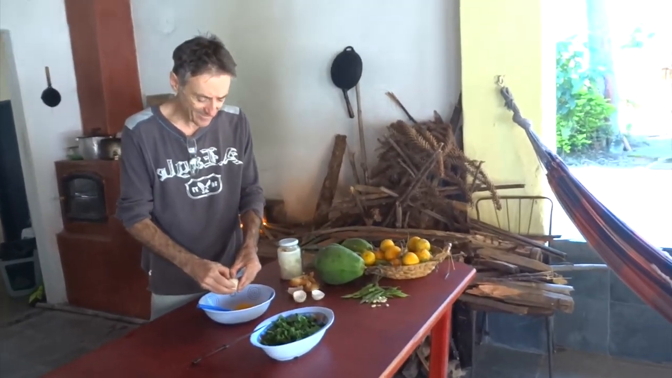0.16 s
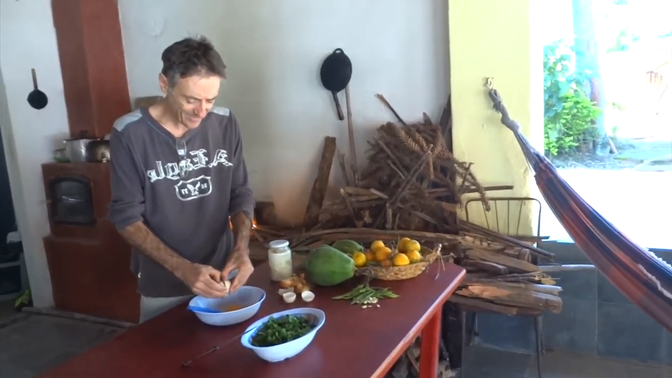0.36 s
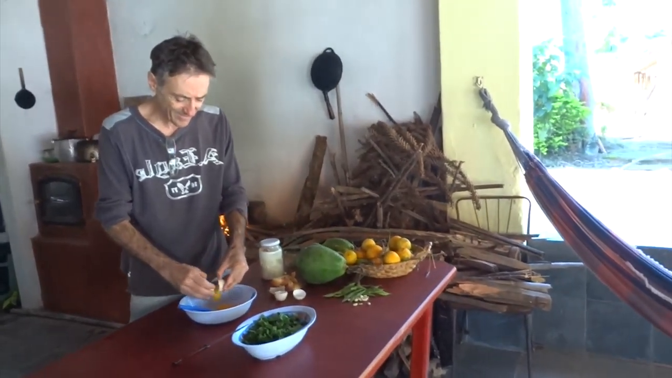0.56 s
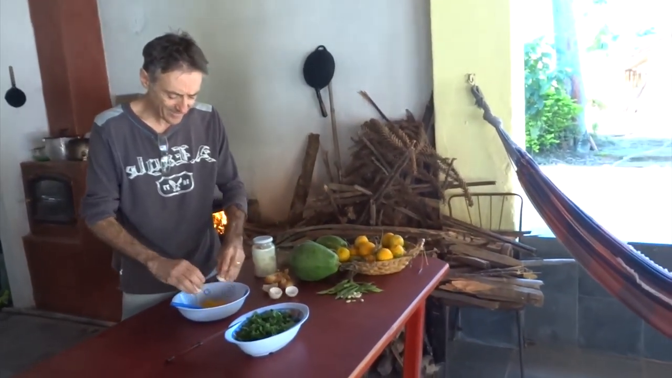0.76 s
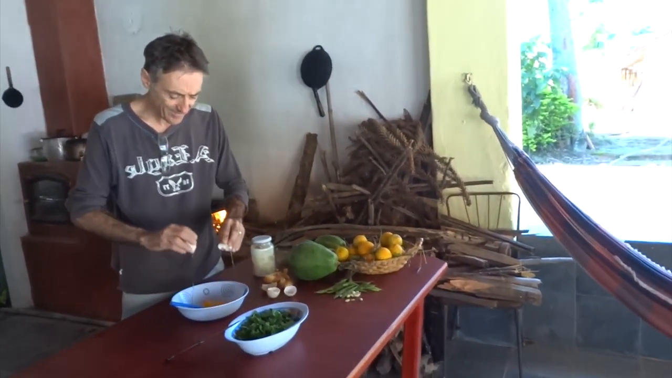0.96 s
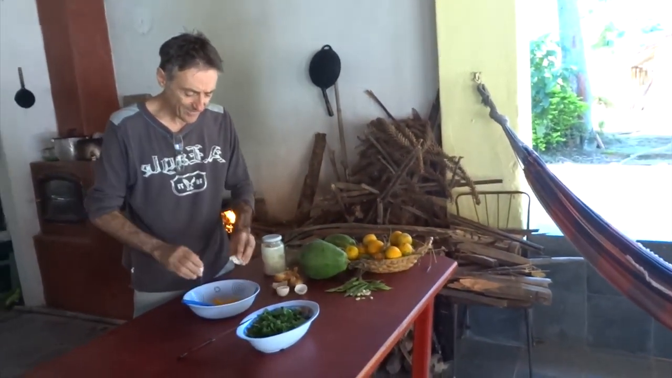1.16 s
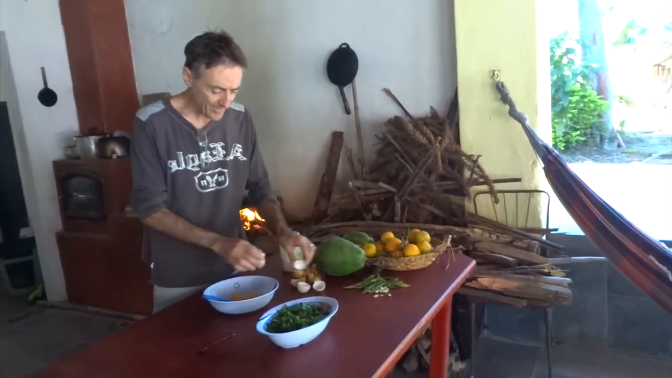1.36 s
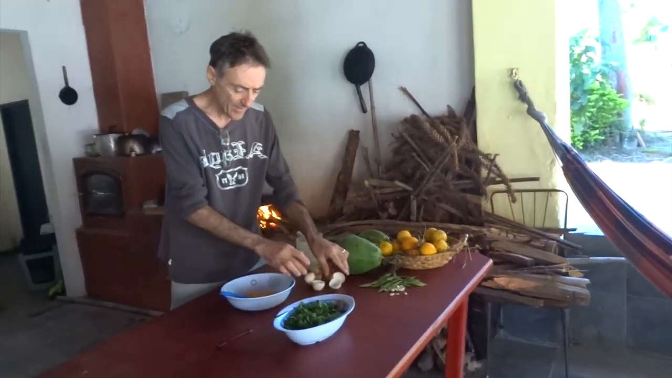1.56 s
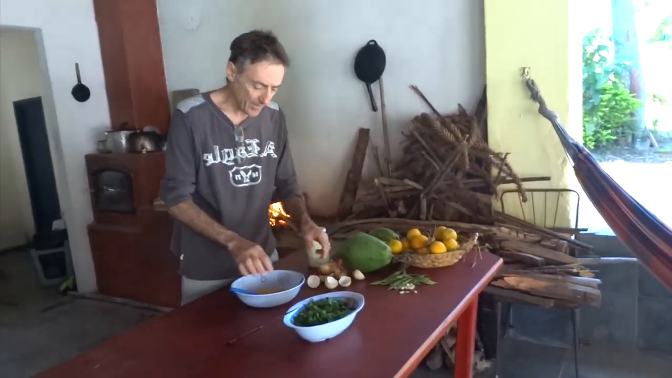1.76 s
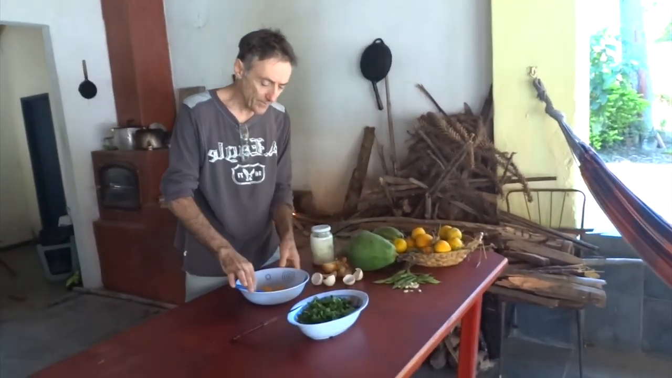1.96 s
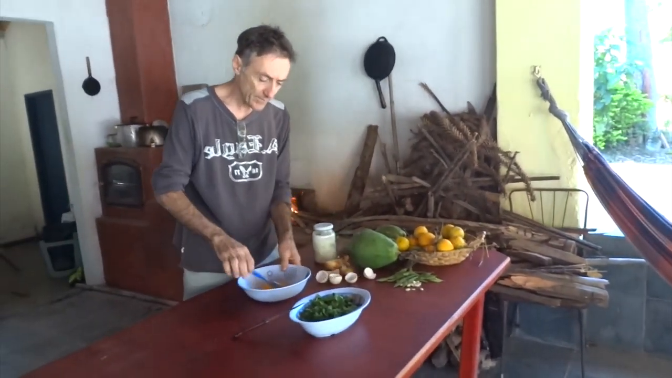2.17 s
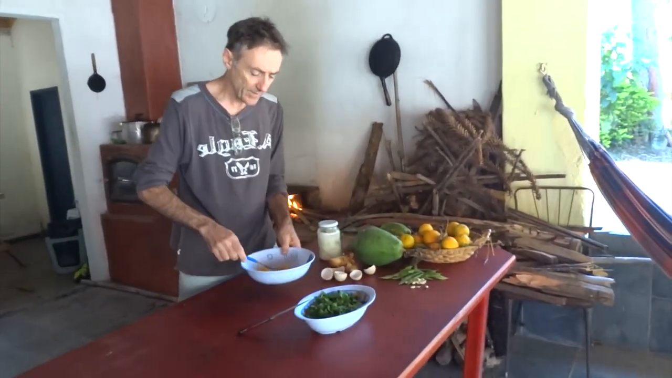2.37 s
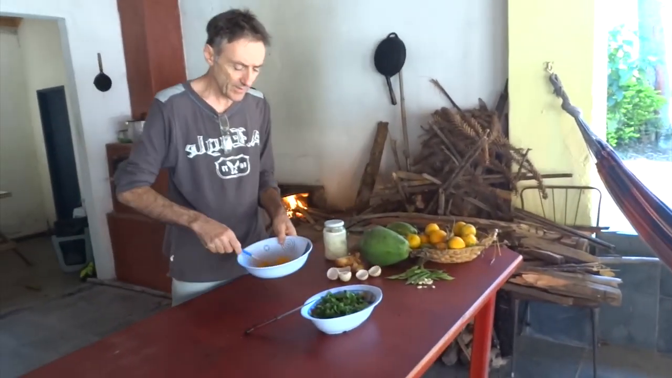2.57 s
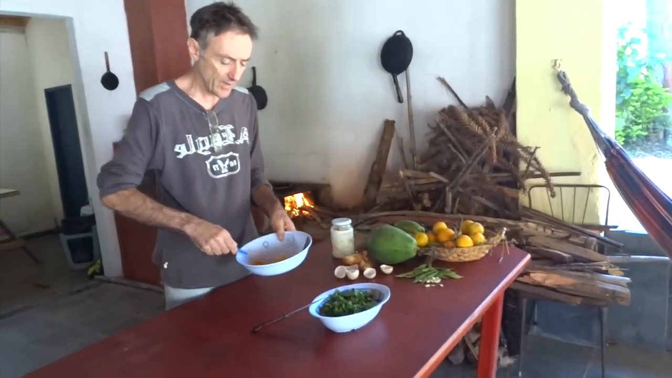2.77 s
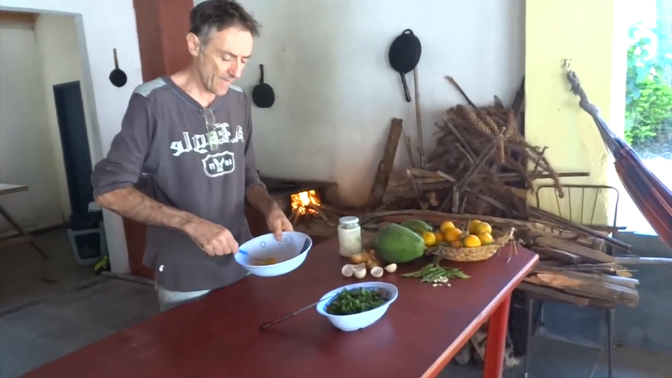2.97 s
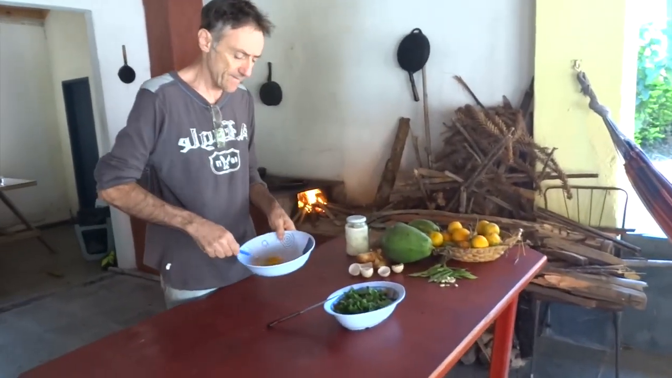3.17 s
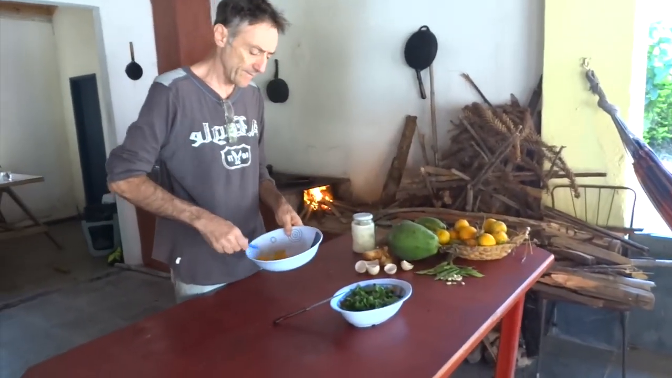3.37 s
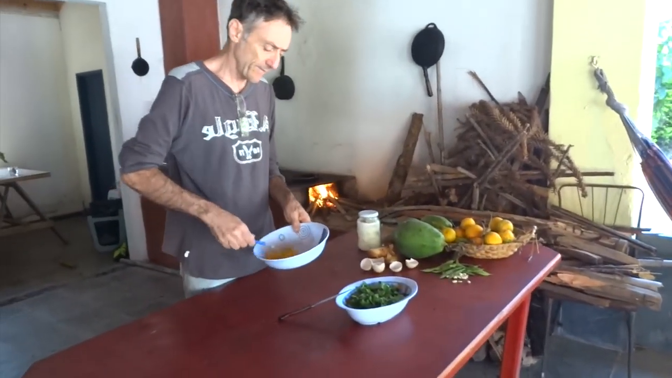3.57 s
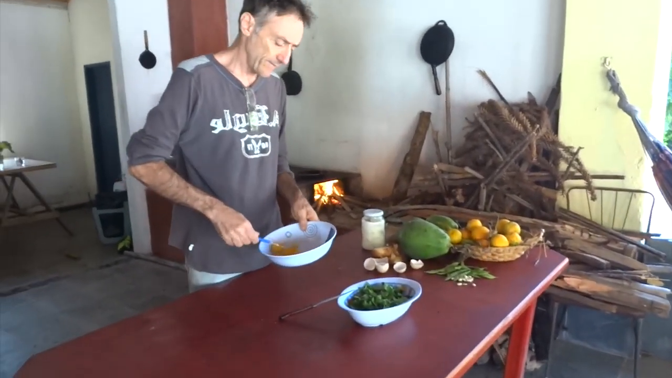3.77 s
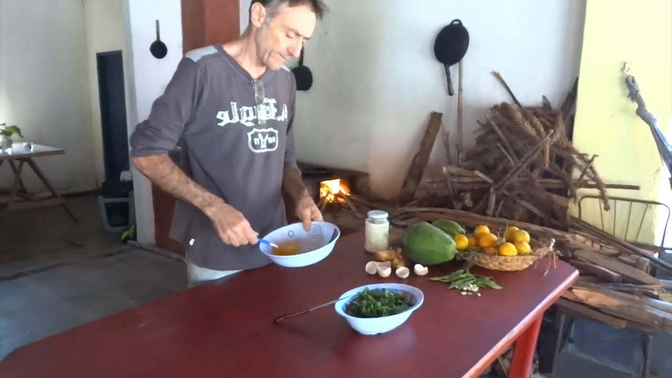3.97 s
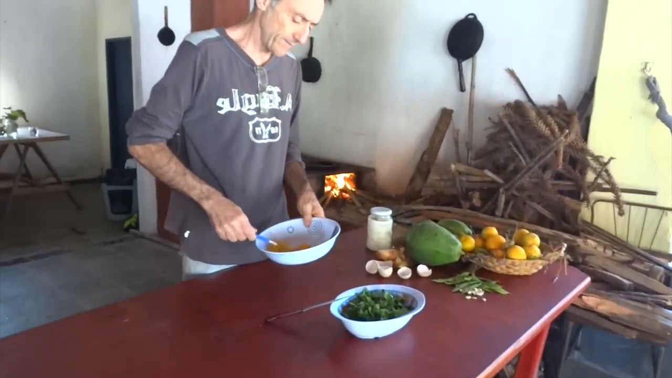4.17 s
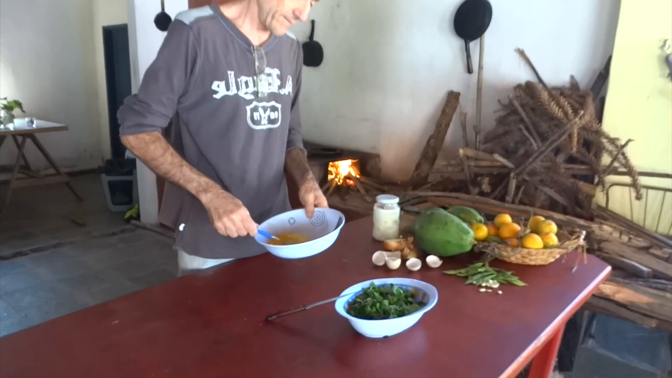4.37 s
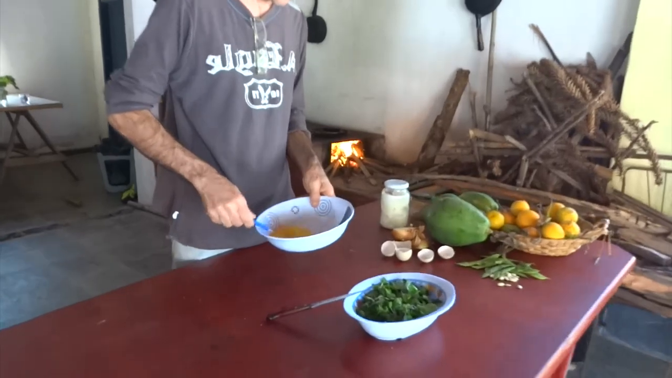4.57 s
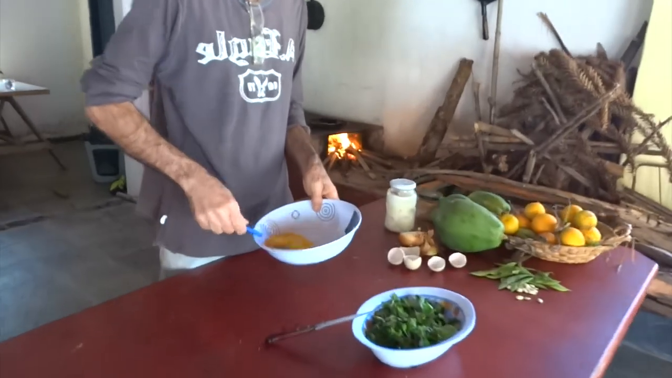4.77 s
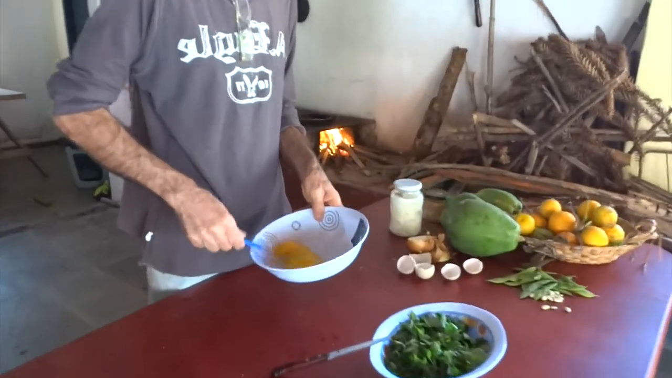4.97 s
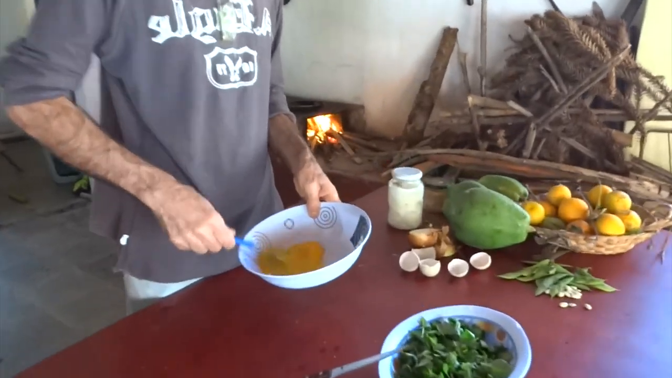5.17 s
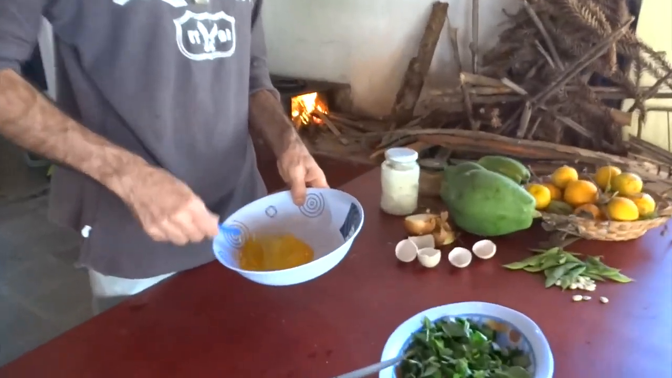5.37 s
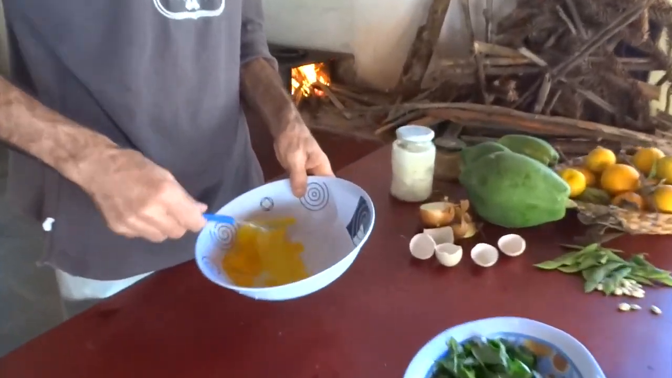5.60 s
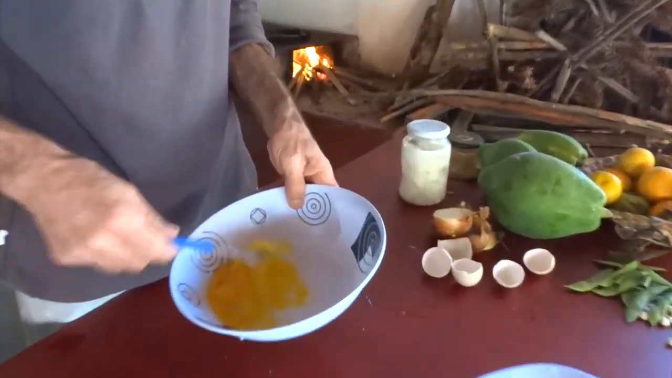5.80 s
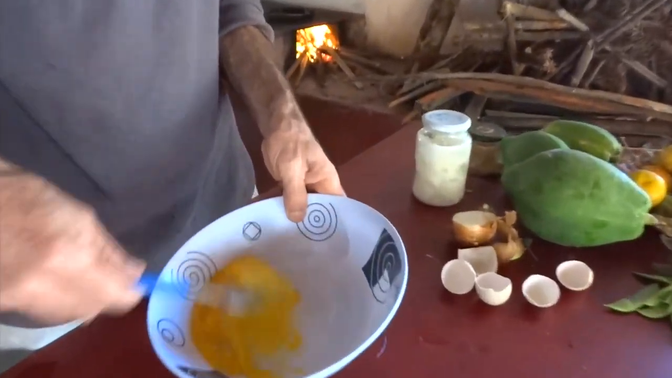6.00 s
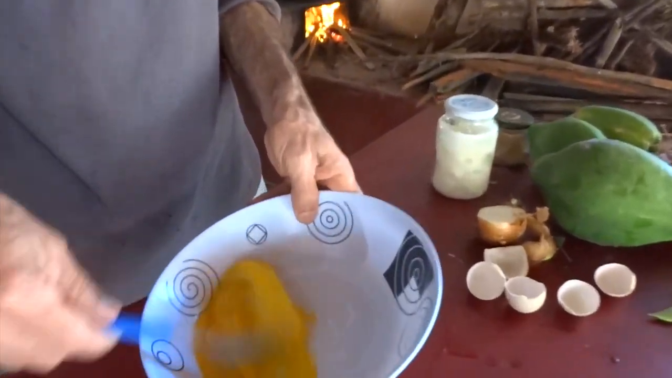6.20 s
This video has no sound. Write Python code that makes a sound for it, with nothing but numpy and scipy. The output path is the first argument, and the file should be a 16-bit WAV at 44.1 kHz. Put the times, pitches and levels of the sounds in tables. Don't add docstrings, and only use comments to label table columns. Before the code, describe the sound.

In a hard-walled kitchen open to a yard, fingers crackle eggshells and set them on a wooden table with small knocks and a quick rustle. A bowl is picked up, and a fork starts beating eggs about five strokes a second, each a bright clink with a wet skid and occasional tiny plops. Faint bird whistles and a thin cricket sit outside. The microphone is fairly close, in stereo, with light hiss.

```python
import sys
import numpy as np
from scipy import signal
from scipy.fft import rfft, irfft
from scipy.io import wavfile
from scipy.ndimage import uniform_filter1d, minimum_filter1d

SR = 44100
rng = np.random.default_rng(int(sys.argv[2]) if len(sys.argv) > 2 else 0)


def generate_wav(sig):
    pcm = np.round(np.clip(np.atleast_2d(sig).T, -1, 1) * 32767).astype(np.int16)
    wavfile.write(sys.argv[1], SR, pcm)


def convert_level_to_amplitude(level_db):
    exponent = np.asarray(level_db, float) / 20
    return 10 ** exponent


N = 275184

# (frequency [Hz], level per Hz [dB])
AIR_COLOUR = [(30, -46), (520, -11), (900, -11.5), (1250, -14.5), (4200, -19), (5000, -15.5), (7000, -27),
              (16000, -32)]
# (time [s], level [dB])
CRICKET_LEVEL = [(0, -78), (.5, -76), (.9, -74), (1.0, -69), (1.2, -73), (1.6, -69), (1.8, -74), (2.6, -76)]
# (start [s], length [s], first pitch [Hz], last pitch [Hz], level [dB])
CHIRPS = [
    (0.331, .025, 4360, 3000, -46.5),
    (.38, 0.35, 3134, 3145, -65.5),
    (0.482, 0.224, 2360, 2150, -64),
    (1.082, .07, 6700, 5500, -66),
    (1.265, 0.074, 6150, 5200, -73),
    (1.319, .16, 7600, 6490, -50.5),
]
# (start [s], length [s], level [dB])
WHISTLES = [
    (2.35, 0.12, -38),
    (4.02, 0.097, -36.5),
    (4.812, .09, -36),
    (5.077, 0.097, -31),
    (6.032, 0.12, -35),
    (6.212, .09, -25),
]
# (frequency [Hz], time to fall by 60 dB [s])
ROOM_RING = [(400, 0.94), (1000, 0.5), (2800, 0.41), (7300, 0.35), (11000, 0.25), (15000, 0.31)]
# (frequency [Hz], side against middle [dB])
ROOM_WIDTH = [(60, -5), (250, -14), (1000, -24), (2000, -15), (4500, -27), (6500, -28), (9500, -8),
              (13000, -21)]
# (peak [s], level [dB], weight on the table [dB], rise by 20 dB [s], fall by 20 dB [s])
SLIDES = [
    (0.0, -57, -28, .1, 1.3),
    (0.38, -58, -13, .28, 2.5),
    (0.76, -54, -3, 0.092, 0),
    (0.95, -62, 6, 0.29, 0),
    (1.45, -63, -40, .9, 5),
    (1.73, -36.5, -4.5, 0.022, 0.2),
    (1.8, -52.5, 15.5, 0.085, 0.19),
    (1.86, -49.5, -10, 0.054, 0.3),
    (2.18, -44, -4, 0.2, 0.3),
    (2.56, -47.5, -14.5, 0.24, 8),
]
# (frequency [Hz], level [dB])
RUSTLE_COLOUR = [(1500, -30), (3000, -21), (5200, 5.5), (7500, 12.5), (9000, 7.5), (11000, -6.5),
                 (16000, -37)]
# (frequency [Hz], level [dB])
DRAG_COLOUR = [(130, -30), (250, -11.5), (800, -8), (2300, 3), (4000, 1.5), (8000, -17)]
# (time [s], level [dB])
STIR_LEVEL = [(2.78, -51), (2.9, -35.5), (3.05, -39), (3.19, -26), (3.3, -39), (3.7, -61), (4.2, -47),
              (5.3, -44), (6.24, -44.5)]
# (frequency [Hz], level [dB])
STIR_COLOUR = [(300, -41), (600, -20.5), (1500, -5.5), (3000, -2.5), (4300, -2), (7300, 2.5), (10000, -4),
               (16000, -40)]
# (time [s], level [dB], pitch [Hz], time to fall by 60 dB [s])
SOFT_NOTES = [(.715, -41.5, 904, 0.087), (.712, -44, 3176, 0.92), (.712, -38, 2900, 0.65),
              (.712, -50, 2200, 1), (2.22, -43.5, 862, 0.067), (2.572, -44, 493, 0.061),
              (2.59, -48, 787, 0.13), (2.575, -36, 1680, 0.22), (2.575, -29, 3420, 0.099),
              (2.81, -47.5, 804, 0.087), (3.0, -16.5, 1800, 0.025), (3.39, -23.5, 1741, 0.078)]
# (time [s], level [dB], pitch [Hz], length [ms])
PLOPS = [(4.523, -21.5, 1465, 4.6), (4.766, -27, 1240, 3), (5.329, -31.5, 723, 19.3),
         (5.359, -40, 775, 15.5), (5.427, -22, 1460, 7.3), (5.524, -24, 2050, 5.7),
         (5.546, -49.5, 1896, 3.8), (5.644, -22.5, 2050, 9), (5.645, -31.5, 863, 12),
         (5.676, -36, 787, 8.5), (5.726, -34, 1180, 14), (5.819, -8.5, 2444, 8), (5.967, -19, 4220, 2.2),
         (6.001, -24.5, 1100, 6.6), (6.125, -37.5, 1000, 9.7)]
# (time [s], level [dB], length [ms], pitch of the hollow they tear [Hz])
SKIDS = [(2.993, -28, 33, 2500), (3.19, -5.5, 9.7, 856), (3.553, -14, 49, 1150), (3.925, -12.5, 20.8, 705),
         (4.115, -12.5, 20.7, 671), (4.297, -20, 5.1, 1180), (4.476, -27, 30, 970), (4.668, -27, 43, 880),
         (4.848, -19.5, 20, 544), (5.031, -14.5, 46, 670), (5.216, -13, 27.3, 600), (5.404, -27, 27, 900),
         (5.599, -20, 3.1, 900), (5.789, -23, 27, 806), (5.975, -23, 11, 870), (6.02, -6, 3.9, 6260),
         (6.158, -23, 32, 558)]
# (lowest [Hz], highest [Hz])
PART_RANGE = [(5080, 14800), (468, 1630), (1240, 2187), (2430, 4260)]
# (time [s], snap [dB], knock [dB], chatter [ms])
SHELL_HITS = [(0.044, -44.5, -74, 8.4), (0.0554, -55, -73, 1.4), (0.0819, -37.5, -61, 3.9),
              (0.18, -49.5, -85, 9), (0.3403, -36.5, -62, 7.7), (0.3593, -30, -75, 6.7),
              (0.5756, -52, -64, 2.9), (0.6084, -38.5, -74, 5), (0.7111, -33.5, -30.5, 11),
              (1.2417, -46, -76, 5), (1.2858, -41.5, -87, 10), (1.378, -45.5, -91, 5.6),
              (1.5834, -53, -92, 4.6), (1.646, -44.5, -79.5, 5.9), (1.6725, -34, -46.5, 14),
              (1.6884, -26.5, -42.5, 6.2), (1.7399, -35, -18.5, 2.4), (1.8724, -35.5, -40, 14),
              (1.9019, -38, -35, 20), (2.0702, -53, -60, 7.9), (2.09, -74, -43.5, 4.3),
              (2.3348, -56, -58, 7.8), (2.3907, -69, -47, 4.5)]
# (pitch [Hz], level [dB], time to fall by 60 dB [s])
SHELL_RINGS = [
    [(6200, 11, 0.0061), (7660, 29, 0.002), (8700, 14, 0.0082), (10700, -72, 0.0022)],
    [(620, -23, .015), (904, 16, 0.012), (1250, -26, .008)],
    [(2200, 13, 0.036), (2500, 43, 0.032), (1800, -16, .004)],
    [(2790, -12, 0.0038), (3280, -18, 0.004), (4000, 8, 0.00035)],
]
# (time [s], tine ring [dB], bowl wall [dB], bowl rim
# [dB], chatter [ms])
TOUCHES = [(2.57, -37, -41, -35, 89), (6.078, -38, -65, -46, 5.3), (6.187, -23, -44, -32, 7.4),
           (2.796, -43, -54, -38, 13), (3.912, -39, -42, -32, 10), (4.657, -33, -39, -37, 3.3),
           (5.211, -20, -21.5, -22, 3), (5.383, -28.5, -65, -32.5, 3.2), (5.593, -48, -64, -34, 4),
           (5.781, -25, -17, -20, 3.7), (5.962, -25.5, -32, -30, 2.8), (6.152, -33, -36, -44, 3.6)]
# (time [s], tine ring [dB], bowl wall [dB], bowl rim [dB], chatter [ms])
BLOWS = [(2.5695, -10.5, -38.5, -68, 15), (2.804, -11, -33.5, -22, 13.4), (2.993, -7, -34.5, -18.5, 12.4),
         (3.1912, -14, -24, -16, 5.4), (3.383, -13, -32.5, -22, 5), (3.5555, -11.5, -21, -14, 40),
         (3.748, -9.5, -27, -18.5, 4.1), (3.927, -16, -20, -19.5, 2.9), (4.1134, -16.5, -18.5, -19, 1.8),
         (4.303, -13, -26, -21, 2.6), (4.4811, -14.5, -28.5, -24, 15.4), (4.664, -6.5, -22.5, -15, 2.6),
         (4.8442, -9.5, -22, -16.5, 9.1), (5.034, -13, -20.5, -14.5, 3.6), (5.2179, -26, -19, -17, 5.3),
         (5.4036, -15.5, -23.5, -24, 16), (5.598, -9, -19, -19, 4.6), (5.7874, -11, -22, -16, 2.2),
         (5.9766, -12, -21, -18.5, 2), (6.1602, -13, -22.5, -19.5, 3.2)]
# (pitch [Hz], level [dB], time to fall by 60 dB [s])
BOWL_RINGS = [
    [(5200, -37, 0.014), (6060, -7, 0.017), (6970, 1, 0.018), (7450, 13.5, 0.0063), (8200, -1.5, 0.011),
     (9920, -1, 0.044), (7135, 8, 0.0074), (12600, 0, 0.0018)],
    [(546, 0, 0.05), (627, 9, 0.056), (836, 30, 0.013)],
    [(1530, -26, 0.0059), (1680, 0, 0.014), (2050, 16, 0.0094), (1800, 3, 0.011)],
    [(3044, 1, 0.0063), (2996, -1, 0.0071), (3220, -19, 0.0078), (3225, 7.5, 0.0064)],
]


def evened(x):
    return x / np.sqrt(np.mean(x ** 2) + 1e-20)


def read(points, hz):
    f, value = np.transpose(points)
    return np.interp(np.log(hz + 1), np.log(f + 1), value)


def curve(rows):
    rows = np.asarray(rows)
    return convert_level_to_amplitude(np.interp(np.arange(N) / SR, rows[:, 0], rows[:, 1], left=-140, right=-140))


def coloured(x, points):
    gain = convert_level_to_amplitude(read(points, np.fft.rfftfreq(len(x), 1 / SR)))
    return evened(irfft(rfft(x) * gain, len(x)))


def passed(x, lo_hz, hi_hz, order=3):
    band = [lo_hz, min(hi_hz, SR / 2.2)]
    return signal.sosfilt(signal.butter(order, band, "band", fs=SR, output="sos"), x)


def add(mix, s, sound):
    part = mix[round(s * SR):][:len(sound)]
    part += sound[:len(part)]


def grit(per_s, spread_db):
    size = convert_level_to_amplitude(spread_db * np.minimum(rng.exponential(1, N), 5)) * rng.choice([-1., 1.], N)
    return size * (rng.random(N) < per_s / SR)


def open_air():
    level_db = -68.5
    shared, apart = convert_level_to_amplitude(level_db) * np.array([coloured(v, AIR_COLOUR) for v in rng.standard_normal((2, N))])
    return shared + np.array([[1], [-1]]) * signal.lfilter([.12, .12], [1, -.55], apart)


def cricket():
    wing_hz, pulses_per_s = 4770, 35
    t = np.arange(N) / SR
    uneven = 1 + 6.3 * uniform_filter1d(rng.standard_normal(N), 2000)
    beat = np.cumsum(pulses_per_s * uneven) / SR
    pulses = 0.63 + np.cos(2 * np.pi * beat)
    return curve(CRICKET_LEVEL) * evened(pulses * np.sin(2 * np.pi * wing_hz * t))


def whistle(hz, db, ends_db):
    flutter = 1 + .2 * uniform_filter1d(rng.standard_normal(SR // 2), 100)[:len(hz)]
    tone = np.sin(2 * np.pi * np.cumsum(hz * flutter) / SR)
    arch_db = db + ends_db * np.linspace(-1, 1, len(hz)) ** 2
    return convert_level_to_amplitude(arch_db) * tone * signal.windows.tukey(len(hz), .2)


def birds():
    settle = 2.8
    top_hz, hz_per_s = 9250, -25500
    out = np.zeros(N)
    for s, length, first_hz, last_hz, db in CHIRPS:
        left = np.linspace(1, 0, round(length * SR))
        pitch = last_hz + (first_hz - last_hz) * left ** settle
        add(out, s, whistle(pitch, db, ends_db=-2.5))
    for s, length, db in WHISTLES:
        pitch = top_hz + hz_per_s * np.arange(0, length, 1 / SR)
        add(out, s, whistle(pitch, db, ends_db=-11))
    return out


def yard_echo(x, t60):
    t = np.arange(SR) / SR
    tail = rng.standard_normal(SR) * convert_level_to_amplitude(-60 * t / t60) * np.minimum(t / 0.0023, 1)
    return signal.fftconvolve(x, tail / np.linalg.norm(tail))[:N]


def yard(shells):
    song = birds()
    echo = yard_echo(convert_level_to_amplitude(3.5) * song, t60=0.64)
    porch = yard_echo(convert_level_to_amplitude(-10) * passed(shells, 1820, 3700), t60=0.69)
    return convert_level_to_amplitude(-4.5) * song + echo + porch + cricket()


def room_tails():
    taps = np.zeros((2, SR))
    at = np.arange(160, SR - 12, 12) + rng.integers(0, 12, (2, (SR - 161) // 12))
    np.put_along_axis(taps, at, rng.choice([-1., 1.], at.shape), 1)
    hz, t, z = signal.stft(taps, SR, nperseg=256)
    z = z * convert_level_to_amplitude(-60 * t / read(ROOM_RING, hz)[:, None])
    z[1] *= convert_level_to_amplitude(read(ROOM_WIDTH, hz) + 1)[:, None]
    tail = signal.istft(z, SR, nperseg=256)[1]
    return tail / np.linalg.norm(tail[0])


def room(x):
    turn = 2 * np.pi * 1.8 * np.arange(N) / SR
    both = np.zeros((2, N))
    for k in range(3):
        share = np.sqrt(2 / 3) * np.cos(turn + k * 2 * np.pi / 3)
        both += signal.fftconvolve((x * share)[None], room_tails(), axes=1)[:, :N]
    mid, side = both
    return np.array([mid + side, mid - side])


def nearest_wall(x):
    late_ms, level_db = 5.8, -22.5
    return x + convert_level_to_amplitude(level_db) * np.roll(x, round(late_ms * SR / 1000))


def slides():
    s, db, weight_db, rise, fall = np.transpose(SLIDES)[:, :, None]
    late = np.arange(0, N + 64, 64) / SR - s
    power = convert_level_to_amplitude(2 * (db - 20 * np.maximum(late / fall, -late / rise)))
    both = np.sqrt([power.sum(0), (power * convert_level_to_amplitude(2 * weight_db)).sum(0)])
    return np.repeat(both, 64, axis=1)[:, :N]


def friction():
    light, heavy = slides()
    stir = curve(STIR_LEVEL) * coloured(grit(2500, spread_db=3.5), STIR_COLOUR)
    rustle = light * coloured(grit(1500, spread_db=1.), RUSTLE_COLOUR)
    drag = heavy * coloured(grit(3000, spread_db=3.5), DRAG_COLOUR)
    lumpy_db, lump_s = np.array([[2.5], [5], [5]]), .03
    width = round(lump_s * SR)
    lumps = uniform_filter1d(uniform_filter1d(rng.standard_normal((3, N)), width), width)
    return (convert_level_to_amplitude(lumpy_db * evened(lumps) - 3) * [stir, rustle, drag]).sum(0)


DEEP_HZ = 750


def soft_notes():
    boom_db, boom_late_s, boom_t60_per_ms = -19, .005, .0026
    waver_hz = 110
    booms = [(s + boom_late_s, db + boom_db, hz, ms * boom_t60_per_ms)
             for s, db, ms, hz in SKIDS if hz < DEEP_HZ]
    out, t = np.zeros(N), np.arange(SR * 2 // 3) / SR
    for s, db, hz, t60 in SOFT_NOTES + booms:
        drift = waver_hz * evened(uniform_filter1d(rng.standard_normal(len(t)), size=500))
        note = np.sin(2 * np.pi * np.cumsum(hz + drift * np.sqrt(hz / 1500)) / SR)
        add(out, s, convert_level_to_amplitude(db - 60 * t / t60) * np.minimum(t / 0.0041, 1) * note)
    return out


def plops():
    rise = .4
    out = np.zeros(N)
    for s, db, hz, ms in PLOPS:
        u = np.arange(2000) / SR * 1000 / ms
        swell = 11 * u * np.exp(-4 * u)
        pitch = hz * (1 + rise * (np.minimum(u, .6) - .25))
        add(out, s, convert_level_to_amplitude(db) * swell * np.sin(2 * np.pi * np.cumsum(pitch) / SR))
    return out


def skids():
    scrape = coloured(grit(6000, spread_db=3.), STIR_COLOUR)
    out, t = np.zeros(N), np.arange(SR // 4) / SR
    for s, db, ms, hollow_hz in SKIDS:
        low_hz = hollow_hz if hollow_hz > DEEP_HZ else 1.5 * hollow_hz
        piece = passed(scrape[round(s * SR):][:len(t)], low_hz, 27000)
        fade = np.exp(-1000 * t / ms) * np.minimum(t / 0.002, 1)
        add(out, s, convert_level_to_amplitude(db) * piece * fade[:len(piece)])
    return out


def strikes(events, parts, detune, uneven_db, per_s):
    longest_ring_s = .018
    t, out = np.arange(3000) / SR, np.zeros(N)
    for s, *levels, chatter_ms in events:
        rebounds = rng.standard_normal(len(t)) * (rng.random(len(t)) < per_s / SR)
        touch = rebounds * np.exp(-1000 * t / chatter_ms) * np.minimum(t / 0.0016, 1)
        touch[0] = 1
        for db, modes, band in zip(levels, parts, PART_RANGE):
            ring = np.zeros(len(t))
            for hz, mode_db, t60 in modes:
                shift, weight = rng.uniform(-0.89, 1, 2)
                fade_db = mode_db + uneven_db * weight - 60 * t / np.clip(t60, .001, longest_ring_s)
                ring += convert_level_to_amplitude(fade_db) * np.sin(2 * np.pi * hz * (1 + detune * shift) * t)
            sound = passed(signal.fftconvolve(touch, ring), *band)
            add(out, s, convert_level_to_amplitude(db) * sound / np.linalg.norm(sound) * np.sqrt(SR / 200))
    return out


def shell_hits():
    thud_db, thud_growth, click_db = -24.5, 0.63, 1.5
    events = [(s, snap, thud_db + thud_growth * knock, knock, knock + click_db, ms)
              for s, snap, knock, ms in SHELL_HITS]
    return strikes(events, SHELL_RINGS, detune=.05, uneven_db=4., per_s=2000)


def fork_blows():
    slap_db, slap_growth, firm_db = -46, 2.1, -23.5
    events = [(s, tine, slap_db + slap_growth * (wall - firm_db), wall, rim, ms)
              for s, tine, wall, rim, ms in BLOWS + TOUCHES]
    return strikes(events, BOWL_RINGS, detune=.03, uneven_db=5., per_s=3500)


def scene():
    shells = shell_hits()
    outside = yard(shells)
    small = passed(fork_blows() + shells + skids() + plops(), 486, 20600, order=5)
    near = small + soft_notes() + friction()
    shade = signal.butter(2, 11500, fs=SR, output="sos")
    direct = nearest_wall(signal.sosfilt(shade, near))
    ringing = convert_level_to_amplitude(-3.0) * room(near + convert_level_to_amplitude(-9.0) * outside)
    return direct + outside + ringing + open_air()


def top_cut(x):
    return signal.sosfilt(signal.butter(12, 16810, fs=SR, output="sos"), x)


def record(dry):
    edge_hz = 15900
    gain = np.minimum(.92 / (abs(dry).max(0) + 1e-9), 1)
    held = dry * uniform_filter1d(minimum_filter1d(gain, 161), 161)
    treble_cut = signal.firwin(511, edge_hz, window=("kaiser", 8), fs=SR)
    limited = signal.oaconvolve(held, treble_cut[None], "same")
    return top_cut(limited)


dry = scene()
out = record(dry)
generate_wav(out)
```